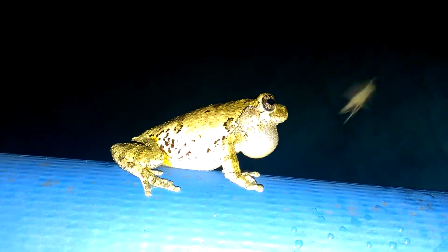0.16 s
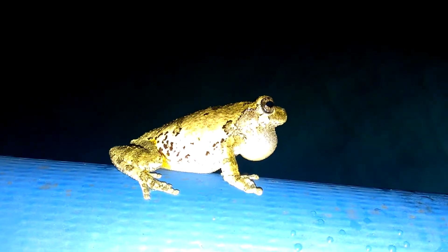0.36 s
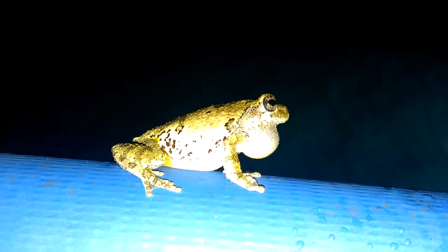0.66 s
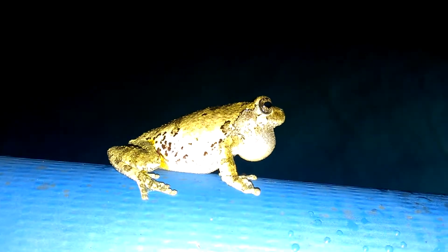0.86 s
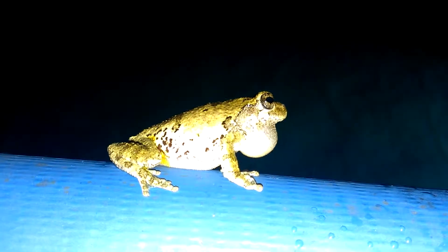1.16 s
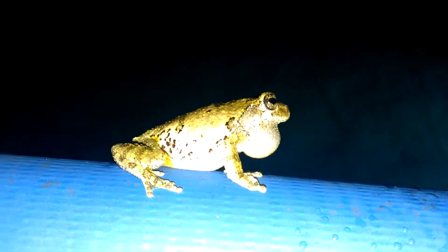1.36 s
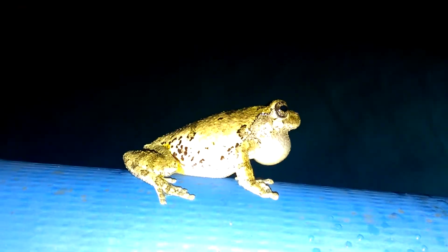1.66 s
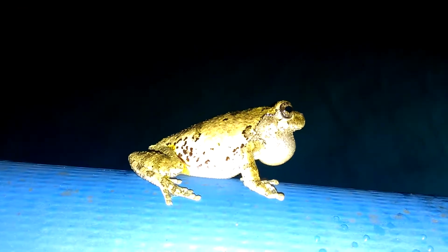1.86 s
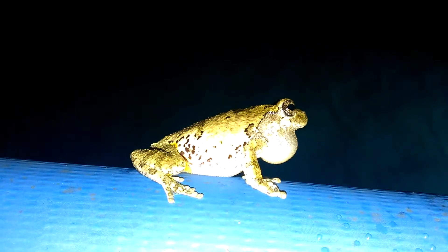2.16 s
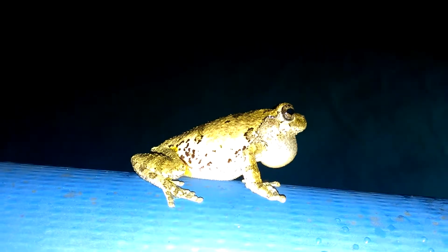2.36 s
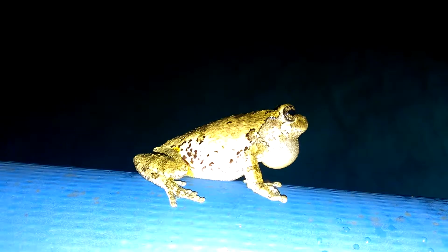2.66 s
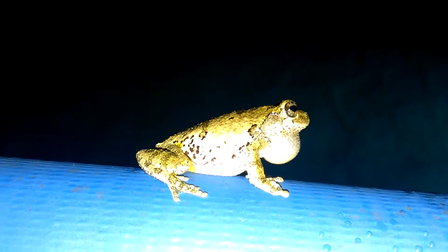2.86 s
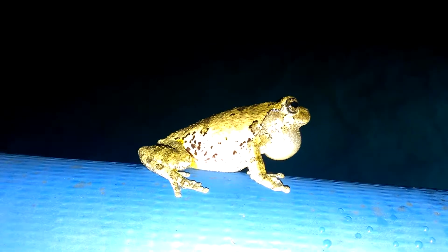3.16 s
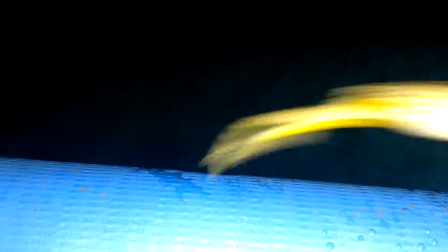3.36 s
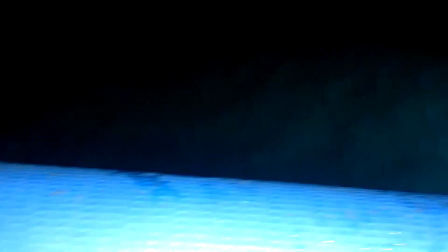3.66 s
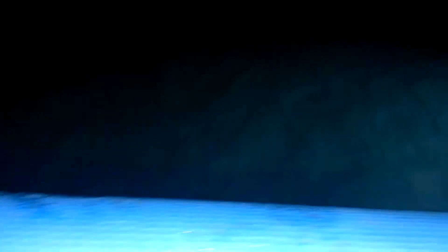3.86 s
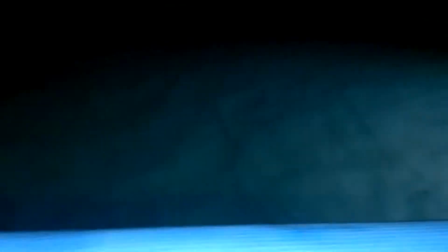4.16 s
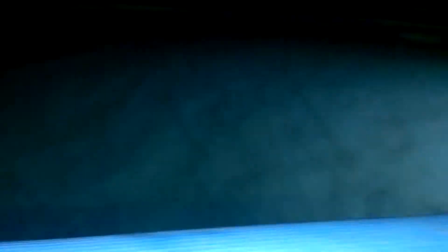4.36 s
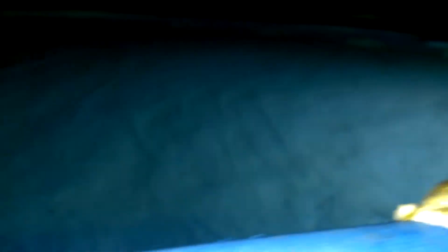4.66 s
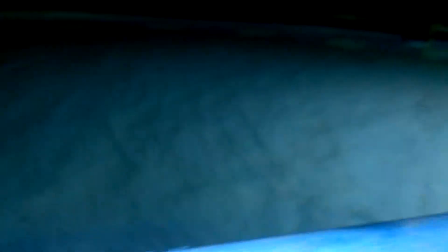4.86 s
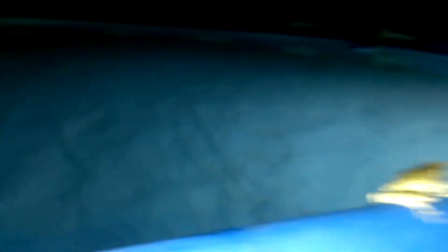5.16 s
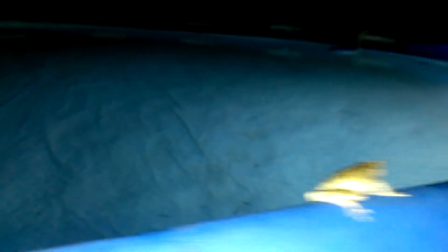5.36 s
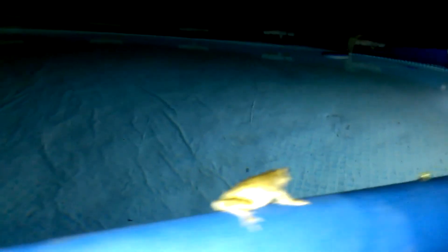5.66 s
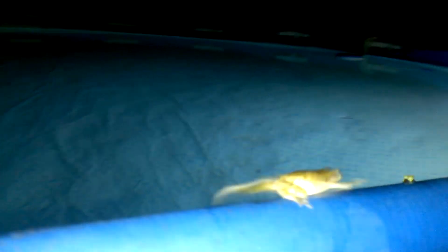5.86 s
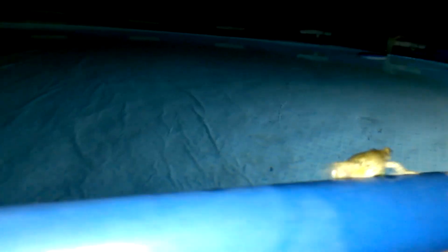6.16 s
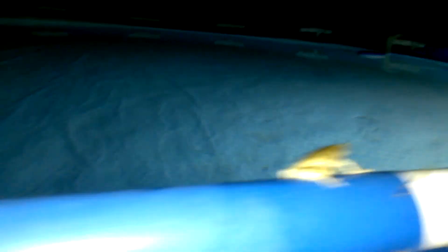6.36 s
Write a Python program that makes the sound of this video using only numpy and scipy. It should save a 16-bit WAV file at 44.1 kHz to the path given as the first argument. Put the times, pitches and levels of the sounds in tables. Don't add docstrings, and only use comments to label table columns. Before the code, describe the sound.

A poolside night, heard through a small stereo microphone. Throughout, tree crickets hold a soft pulsing drone near 2.7 kHz, with a thin high buzz of ground crickets and quiet air murmur. At 0 s a close treefrog is already trilling, loud and rattling, about fifty gliding pulses a second, stopping near 0.15 s with short echoes. From 0.75 to 1.55 s a second, slightly higher frog answers, swelling quickly and slowing a little. Insects alone follow. Around 2.4 s a faint far frog tries briefly; from 2.5 to 3.0 s the near frog trills again, loudest of all. A faint drop ticks at 3.4 s. A katydid rasps softly around 0.7, 2.5, 4.1-4.6 and 5.7-6.0 s. At 4.46 s comes a tenth-of-a-second hoarse, rising yelp. The far frog trills weakly and blurred from 5.0 to 5.5 s. A sharp double tick snaps at 5.62 s, a fainter one at 6.12 s; crickets continue to the end.

```python
import sys
import numpy as np
from scipy import signal
from scipy.fft import rfft, irfft
from scipy.io import wavfile
from scipy.ndimage import uniform_filter1d

SR = 44100
rng = np.random.default_rng(int(sys.argv[2]) if len(sys.argv) > 2 else 0)


def decibels_to_gain(level_db):
    exponent = np.asarray(level_db, float) / 20
    return 10 ** exponent


def waveform_to_disk(signal):
    frames = np.transpose(np.atleast_2d(signal))
    scaled = np.clip(frames, -1, 1) * 32767
    samples = np.round(scaled).astype(np.int16)
    wavfile.write(sys.argv[1], SR, samples)


N = 286650
RUN_IN = SR // 5


def rms_one(x):
    return x / np.sqrt(np.mean(x ** 2) + 1e-20)


def in_time(rows):
    s, *columns = np.transpose(rows)
    return [np.interp(np.arange(N) / SR, s, column) for column in columns]


def at_hz(points, hz):
    return np.interp(np.log(hz), np.log(np.array(points)[:, 0]), np.array(points)[:, 1])


def drift(rate_hz):
    knots = rng.standard_normal(400)
    return np.interp(np.arange(N) / SR * rate_hz * 2, np.arange(400), knots) * np.sqrt(3 / 2)


def hump(ms, rise_ms, fall_ms):
    return np.exp(-.5 * (ms / np.where(ms < 0, rise_ms, fall_ms)) ** 2)


def wedge(ms, rise_ms, fall_ms):
    reach = np.abs(ms) / np.where(ms < 0, rise_ms, fall_ms) / 2.3
    return np.clip(1 - reach ** 1.5, 0, 1) ** 1.4


def resonate(x, hz, width_hz):
    r = np.exp(-np.pi * width_hz / SR)
    return signal.lfilter([(1 - r * r) / 2, 0, (r * r - 1) / 2], [1, -2 * r * np.cos(2 * np.pi * hz / SR), r * r], x)


def body(x, modes):
    out = 0
    for k, (hz, width_hz, db) in enumerate(modes):
        twice = resonate(resonate(x, hz, width_hz), hz, width_hz)
        out = out + (-1) ** k * decibels_to_gain(db) * twice
    return out


def alike_noise(likeness):
    mid, side = rng.standard_normal((2, N))
    c = np.clip(likeness, -1, 1)
    return np.sqrt((1 + c) / 2) * mid + np.sqrt((1 - c) / 2) * side * [[1], [-1]]


def yard(x, echoes, walls=()):
    ms = np.arange(SR // 5) / SR * 1000
    density = 0
    for lag_ms, spread_ms, db in echoes:
        density = density + decibels_to_gain(db) * hump(ms - lag_ms, spread_ms, spread_ms) / np.sqrt(spread_ms * SR / 500)
    paths = rng.standard_normal((2, len(ms))) * density
    for left_ms, right_ms, db in walls:
        arrivals = [round(left_ms * SR / 1000), round(right_ms * SR / 1000)]
        paths[[0, 1], arrivals] += decibels_to_gain(db)
    paths = signal.lfilter(*signal.butter(2, 4500, fs=SR), paths)
    reflected = signal.fftconvolve(x, paths, axes=1)[:, :x.shape[1]]
    return (x + reflected)[:, -N:]


# pitch_hz, level_db [dB per Hz]
AIR_COLOUR = [(40, -30.5), (110, -13), (200, -5.5), (430, -10.5), (700, -1.5), (980, -7.5), (1300, -3.5),
              (1800, -16.5), (2400, -6.5), (3200, -11.5), (3700, -8.5), (6000, -21), (7200, -21),
              (8200, -19.5), (15000, -22)]
# pitch_hz, likeness [-1 to 1]
PORT_LIKENESS = [(60, 0.92), (180, 0.84), (550, 0.75), (1650, 0.57), (4970, 0.51), (15000, 0.083)]


def night_air(level_db):
    hz = np.fft.rfftfreq(N, 1 / SR) + 1
    c = np.clip(at_hz(PORT_LIKENESS, hz), -1, 1)
    mid, side = rfft(rng.standard_normal((2, N))) * decibels_to_gain(at_hz(AIR_COLOUR, hz))
    air = irfft(np.sqrt(1 + c) * mid + np.sqrt(1 - c) * side * [[1], [-1]], N)
    return decibels_to_gain(level_db + 8.0) * rms_one(air)


def tree_crickets(level_db):
    t, singers = np.arange(N) / SR, 0
    for tune, rate, start, side in rng.standard_normal((7, 4)):
        pulses = np.maximum(np.sin(2 * np.pi * (57 + 7.4 * rate) * t + 3 * start) + 0.1, 0)
        phase = 2 * np.pi * np.cumsum(2665 + 45 * tune + 12 * drift(1.3)) / SR
        ports = np.sin(phase + 0.12 * side * np.array([[1], [-1]]))
        singers = singers + decibels_to_gain(4.5 * drift(3.1)) * pulses * ports
    haze = resonate(body(alike_noise(0.49), [(2666, 250, 0)]), 2562, 670)
    return decibels_to_gain(level_db) * rms_one(rms_one(singers) + decibels_to_gain(3.5) * rms_one(haze))


# pitch_hz, width_hz, level_db
GROUND_WING_MODES = [(5390, 650, -10.5), (6178, 515, -1)]


def ground_crickets(level_db):
    throb = 1 + 0.13 * np.sin(2 * np.pi * np.cumsum(83 + 2.6 * drift(0.36)) / SR)
    buzz = body(alike_noise(0.49) * throb, GROUND_WING_MODES)
    buzz = signal.sosfilt(signal.butter(6, 6700, fs=SR, output="sos"), buzz)
    return decibels_to_gain(level_db + 2.0 * drift(7.2)) * rms_one(buzz) * decibels_to_gain([[-.9], [.9]])


# start_s, level_db [peak], pitch_hz [ring]
DROP_TICKS = [
    (3.404, -55.5, 5000),
    (5.038, -44, 7840),
    (5.6219, -12, 6230),
    (5.6245, -15, 6730),
    (5.6448, -36, 6600),
    (6.1227, -31, 7040),
    (6.125, -35.5, 5000),
]


def drop_ticks():
    out = np.zeros(N)
    click = np.zeros(600)
    click[0] = 1
    for start_s, db, hz in DROP_TICKS:
        ring = 9.1 * resonate(click, hz, 700)
        ring += 3.1 * resonate(click, 1.35 * hz, 1500)
        ring += 4.1 * resonate(click, .62 * hz, 500)
        i = round(start_s * SR)
        out[i:i + 600] += decibels_to_gain(db) * ring
    band = signal.butter(3, [2000, 10000], "band", fs=SR, output="sos")
    return signal.sosfilt(band, out) * decibels_to_gain([[-1.1], [1.1]])


# pitch_hz, width_hz, level_db
KATYDID_WING_MODES = [(4400, 400, 5), (5200, 2000, -4), (3750, 600, -9)]
# start_s [first rasp], rasps [count], level_db, low_buzz_db
KATYDID_SERIES = [
    (.677, 2, -56, -10),
    (2.48, 2, -56, -10),
    (4.085, 6, -53.5, -10),
    (5.657, 5, -53, -6),
]


def katydid():
    gap_s, scatter_db = 0.0933, 2.5
    ms, scrape = np.arange(N) / SR * 1000, alike_noise(0.84)
    high, low = 0, 0
    for start_s, count, series_db, low_db in KATYDID_SERIES:
        for k in range(round(count)):
            from_rasp = ms - 1000 * (start_s + k * gap_s)
            db = series_db + scatter_db * rng.standard_normal()
            high = high + decibels_to_gain(db) * (hump(from_rasp, 5.6, 17) + 1.4 * hump(from_rasp, 25, 47))
            low = low + decibels_to_gain(db + low_db) * hump(from_rasp, 37, 20)
    top = signal.sosfilt(signal.butter(4, 8000, "high", fs=SR, output="sos"), scrape)
    hiss = decibels_to_gain(-14) * uniform_filter1d(high, size=4000) * top
    wings = high * rms_one(body(scrape, KATYDID_WING_MODES))
    return hiss + wings + low * rms_one(body(scrape, [(1863, 240, 0)]))


def pulse_rows(trills, pace, effort):
    gap_ms, slowing_ms, jitter_ms = pace
    swell_db, full_at, full_hz, sag_hz, uneven_db = effort
    knee_pulses, sag_db = 1.1, 7
    rows = []
    for start_s, count, full_db in trills:
        k, chance = np.arange(count), rng.standard_normal((count, 3))
        late_ms = gap_ms * k + slowing_ms * k * (k - 1) / 2 + jitter_ms * chance[:, 0]
        s = start_s + late_ms / 1000
        lack_db = swell_db * knee_pulses * np.log(1 + np.exp((full_at - k) / knee_pulses))
        hz = full_hz - sag_hz * (1.5 - np.exp(-lack_db / sag_db)) + 5 * uneven_db * chance[:, 1]
        first_db = -10 * (k == 0)
        effort_db = full_db - lack_db + first_db + uneven_db * chance[:, 2]
        rows += [row for row in zip(s, effort_db, hz) if row[0] > -RUN_IN / SR]
    return rows


def trill(pulses, voice, parts_db, lead_ms, soft_slope):
    thin_db = 70
    out = np.zeros((2, RUN_IN + N + 1200))
    ms = np.arange(-600, 600) / SR * 1000
    port_ms = ms + np.array([[lead_ms / 2], [-lead_ms / 2]])
    loudest = max(db for s, db, hz in pulses)
    for s, db, hz in pulses:
        i, lack_db = round(s * SR) + RUN_IN, loudest - db
        wobble = rng.standard_normal(len(voice))
        for (multiple, centre, rise, fall, pan_db, glide), part_db, w in zip(voice, parts_db, wobble):
            lowest = multiple < 3 / 2
            bend = glide / 100 * 3 * (1 + lack_db / 12) ** (-1 if lowest else 1 / 2)
            slide = port_ms + bend * np.log(np.cosh((port_ms - centre) / 3))
            effort_db = loudest - lack_db * (soft_slope if lowest else 1 + lack_db / thin_db)
            gain = decibels_to_gain(effort_db + part_db + .4 * w + np.array([[pan_db / 2], [-pan_db / 2]]))
            slow_fall = fall * (1 + lack_db / (9 if lowest else 30))
            tone = np.sin(2 * np.pi * multiple * hz / 1000 * slide)
            out[:, i:i + 1200] += gain * wedge(ms - centre, rise, slow_fall) * tone
    return signal.sosfilt(signal.butter(6, 900, "high", fs=SR, output="sos"), out[:, 600:-600] + 1e-18)


# multiple, centre_ms, rise_ms, fall_ms, left_right_db, glide_percent
FAR_PARTIALS = [(1, 0, 2.4, 1.8, -4.6, 5), (1.86, -1, 1.8, 1.6, -1.4, 10), (2.8, 1, 1.5, 1.5, .4, 5)]
FAR_PARTIALS_DB = [1.5, 10, -16]
# start_s [first pulse], pulses [count], level_db [full effort]
FAR_CALLS = [
    (2.4, 7, -42),
    (4.9905, 25, -34),
]
# swell_db [per pulse], full_at [pulses], pitch_hz [reference; full-effort pulses sit half a sag
# below it], sag_hz [weakest pulses sit 1.5 sags below the reference], uneven_db
FAR_SWELL = (2.5, 2.6, 1408, 12, 1.3)
# delay_ms, spread_ms, level_db
FAR_SCATTER = [(8.9, 12, 3.5), (32, 2, -7.5), (69.4, 17, -13.5)]


def far_frog():
    pulses = pulse_rows(FAR_CALLS, pace=(19.93, 0, .9), effort=FAR_SWELL)
    call = trill(pulses, FAR_PARTIALS, FAR_PARTIALS_DB, lead_ms=-0.061, soft_slope=1.0)
    return decibels_to_gain(-7.5) * yard(call, FAR_SCATTER)


# start_s, level_db, pitch_hz
YELP_PATH = [
    (4.461, -73, 448),
    (4.465, -30, 462),
    (4.475, -25, 485),
    (4.49, -25.5, 546),
    (4.505, -27, 625),
    (4.522, -28.5, 652),
    (4.545, -29.5, 618),
    (4.562, -34, 605),
    (4.571, -76, 598),
]
# pitch_hz, width_hz, level_db
THROAT_MODES = [(726, 250, -9), (1174, 187, -0.2), (1980, 1900, -11)]
# pitch_hz, width_hz, level_db
THROAT_TOP_MODES = [(3200, 400, -31), (4150, 600, -28)]
# delay_ms, spread_ms, level_db
YELP_SCATTER = [(15.46, 0.83, -15), (35, 30, -24)]


def yelp():
    level_db, hz = in_time(YELP_PATH)
    hoarse_from_s, hoarse_takes_s = 4.525, .03
    rough = np.interp(np.arange(N) / SR, [hoarse_from_s, hoarse_from_s + hoarse_takes_s], [.14, .4])
    phase = 2 * np.pi * np.cumsum(hz) / SR
    shake = signal.lfilter([.03], [1, -.97], rng.standard_normal(N)) * 6.1
    cords = sum(np.cos(k * phase) for k in range(1, 9)) * (1 + rough * shake)
    sounding = (np.arange(N) > YELP_PATH[0][0] * SR) & (np.arange(N) < YELP_PATH[-1][0] * SR)
    cords = cords * decibels_to_gain(level_db + 8.5) * sounding + 1e-18
    cry = signal.sosfilt(signal.butter(6, 2300, fs=SR, output="sos"), body(cords, THROAT_MODES))
    cry = cry + body(cords, THROAT_TOP_MODES)
    left = decibels_to_gain(-0.9) * np.roll(cry, round(.12e-3 * SR))
    return yard(np.array([left, decibels_to_gain(2.0) * cry]), YELP_SCATTER)


# multiple, centre_ms, rise_ms, fall_ms, left_right_db, glide_percent
SECOND_PARTIALS = [(1.04, .3, 2.2, 1.4, .4, 6), (2, 0, 1.9, 1.5, .8, 6.5), (3.07, 2.4, 1.1, 1.4, -3, -7),
                   (3.3, -1.5, .9, .9, -2, 6), (1.72, -3.5, .8, .7, 0, 8), (2.4, 2.5, .5, .5, 0, 8)]
SECOND_PARTIALS_DB = [-13, -2, -17.5, -29.5, -26.5, -24.5]
# start_s [first pulse], pulses [count], level_db [full effort]
SECOND_CALLS = [
    (.7548, 40, -8.6),
]
# swell_db [per pulse], full_at [pulses], pitch_hz [reference; full-effort pulses sit half a sag
# below it], sag_hz [weakest pulses sit 1.5 sags below the reference], uneven_db
SECOND_SWELL = (7.2, 4.0, 1379, 30, .4)
# delay_ms, spread_ms, level_db
SECOND_SCATTER = [(17.2, 5.8, -14.5), (46.7, 20, -11), (76.9, 4, -34.5)]
# left_delay_ms, right_delay_ms, level_db
SECOND_SURFACES = [(6.3, 7.1, -20), (13.4, 13.1, -19)]


def second_frog():
    pulses = pulse_rows(SECOND_CALLS, pace=(18.88, .06, .12), effort=SECOND_SWELL)
    call = trill(pulses, SECOND_PARTIALS, SECOND_PARTIALS_DB, lead_ms=-.07, soft_slope=.5)
    return decibels_to_gain(1.07) * yard(call, SECOND_SCATTER, SECOND_SURFACES)


# multiple, centre_ms, rise_ms, fall_ms, left_right_db, glide_percent
NEAR_PARTIALS = [(.93, -2.6, 1.8, 2.2, 1, 8), (1.12, 2.2, 1.6, 2.6, 4, 5), (2.065, .3, 1.7, .7, -4, 6),
                 (1.98, -5.2, 1.8, .9, -1.5, 7), (3.1, 1.5, 1.7, 1.8, -.6, 8), (2.9, -4, .9, .9, 2, 4),
                 (3.9, -4.6, .8, .8, 0, 3), (3.55, -1.5, .9, .9, 0, 8), (3.9, .5, 1.3, 1, 0, 3),
                 (6.88, -1.6, 1.9, 1.9, 0, 1), (8.03, -1, 3.2, 4, 2, .6), (1.76, -2.5, 1.1, .9, 0, 8),
                 (2.5, 1.6, .5, .5, -2, 8)]
NEAR_PARTIALS_DB = [-22.5, -23.5, 0.25, -12.5, -18.5, -34.5, -25.5, -24.5, -32, -30, -44, -22, -20.5]
# start_s [first pulse], pulses [count], level_db [full effort]
NEAR_CALLS = [
    (-.3417, 24, -6.8),
    (2.528, 24, -4.3),
]
# swell_db [per pulse], full_at [pulses], pitch_hz [reference; full-effort pulses sit half a sag
# below it], sag_hz [weakest pulses sit 1.5 sags below the reference], uneven_db
NEAR_SWELL = (7.8, 4.2, 1246, 40, .4)
# delay_ms, spread_ms, level_db
NEAR_SCATTER = [(20.3, 7, -9.5), (43.4, 11, -18), (61.5, 6.8, -10.5), (110, 9, -15.5), (122.5, 19.6, -17)]
# left_delay_ms, right_delay_ms, level_db
NEAR_SURFACES = [(2.6, 5.9, -19), (14.1, 14.9, -8.5), (18.6, 17.7, -13)]


def near_frog():
    pulses = pulse_rows(NEAR_CALLS, pace=(19.525, .0184, .12), effort=NEAR_SWELL)
    call = trill(pulses, NEAR_PARTIALS, NEAR_PARTIALS_DB, lead_ms=.02, soft_slope=.5)
    return decibels_to_gain(-0.83) * yard(call, NEAR_SCATTER, NEAR_SURFACES)


# start_s, tree_crickets_db, ground_crickets_db
INSECT_CHORUS = [(0, -45, -49), (.5, -46.5, -57), (1, -48.5, -53), (1.6, -47.5, -55.5), (2.3, -45.5, -55),
                 (3, -41.5, -47.5), (3.3, -46.5, -56), (3.9, -47, -57.5), (4.5, -44.5, -54),
                 (4.9, -48.5, -52), (5.25, -43.5, -43.5), (5.9, -48, -53), (6.5, -47, -47.5)]


def scene():
    tree_db, ground_db = in_time(INSECT_CHORUS)
    air_db = -65.5 + 0.67 * np.maximum(ground_db + 53, 0)
    insects = tree_crickets(tree_db) + ground_crickets(ground_db) + katydid()
    frogs = far_frog() + yelp() + second_frog() + near_frog()
    return night_air(air_db) + insects + drop_ticks() + frogs


# pitch_hz [lower edge], level_db [under the total at which the band falls silent]
BAND_REACH = [(0, 61), (220, 58), (860, 99), (6950, 49), (7600, 72), (9550, 72), (10350, 66), (12500, 63),
              (14200, 59)]


def silence_faint_bands(x):
    shift = 390
    hz, _, frames = signal.stft(np.pad(x, ((0, 0), (shift, 0))), SR, "cosine", 2048)
    power = np.mean(np.abs(frames) ** 2, axis=0) + 1e-20
    edges, reach_db = np.transpose(BAND_REACH)
    band = np.searchsorted(edges, hz, "right") - 1
    per_bin = np.array([power[band == k].mean(axis=0) for k in range(len(edges))])
    spare_db = 1.3 * rng.standard_normal(len(power[0])) + 0.43 * rng.standard_normal(per_bin.shape)
    under_db = 10 * np.log10(power.sum(axis=0) / per_bin)
    kept = under_db < reach_db[:, None] + spare_db + .1
    return signal.istft(frames * kept[band], SR, "cosine", 2048)[1][:, shift:shift + N]


def low_pass(x):
    return signal.sosfilt(signal.butter(12, 15830, fs=SR, output="sos"), x)


def record(dry):
    mix = silence_faint_bands(dry)
    return low_pass(mix)


dry = scene()
out = record(dry)
waveform_to_disk(out)
```